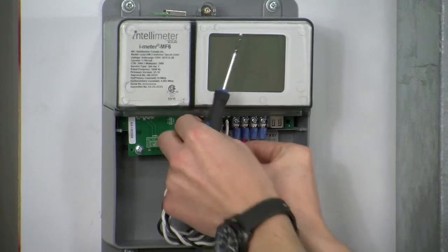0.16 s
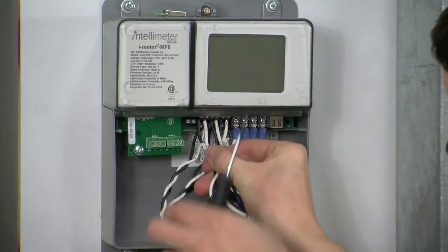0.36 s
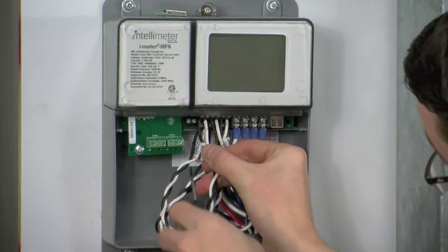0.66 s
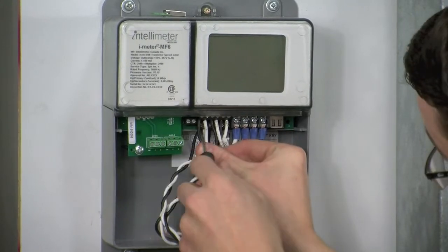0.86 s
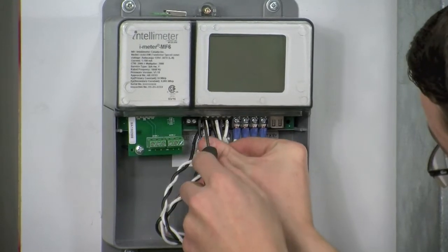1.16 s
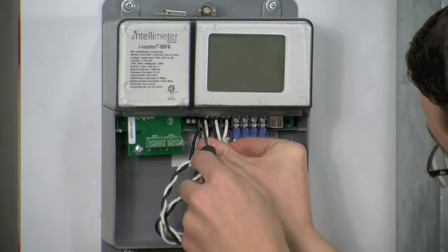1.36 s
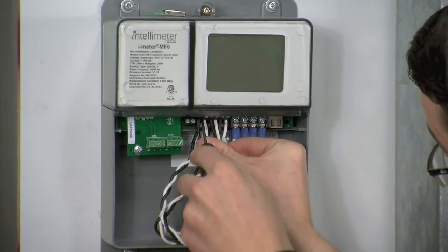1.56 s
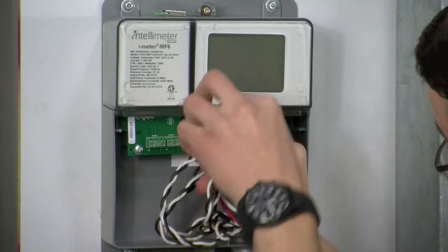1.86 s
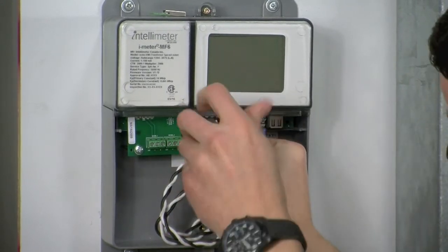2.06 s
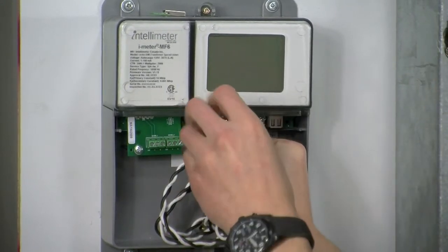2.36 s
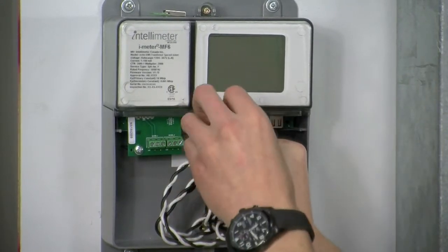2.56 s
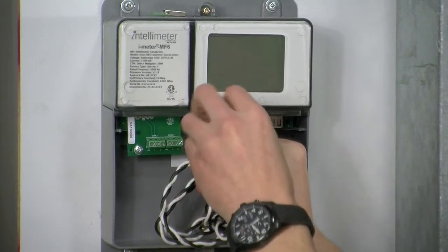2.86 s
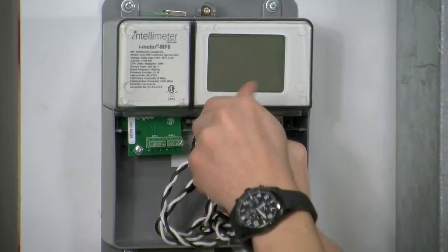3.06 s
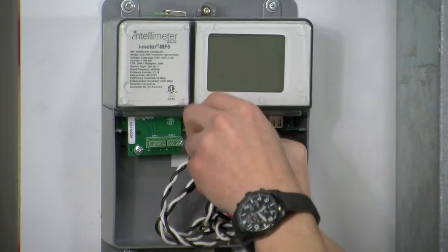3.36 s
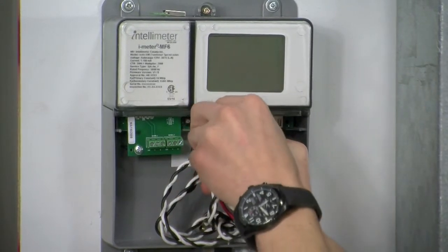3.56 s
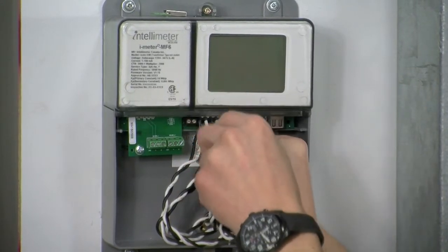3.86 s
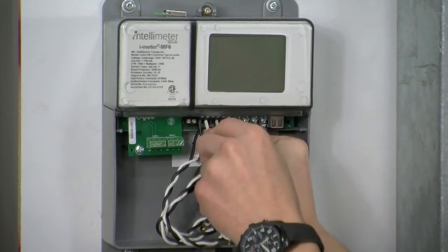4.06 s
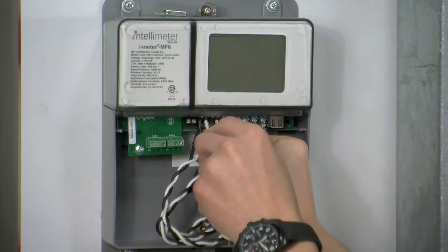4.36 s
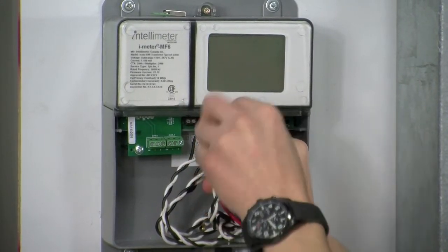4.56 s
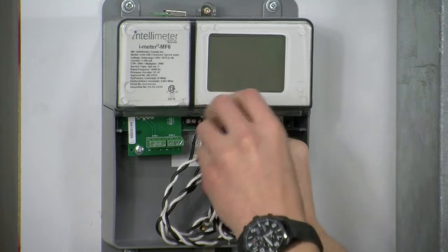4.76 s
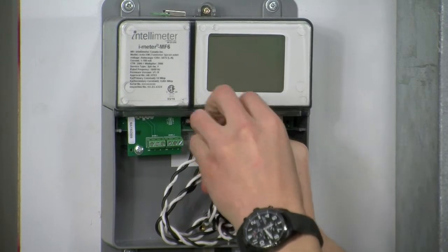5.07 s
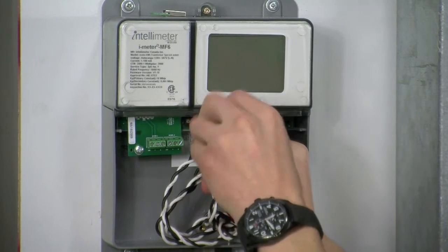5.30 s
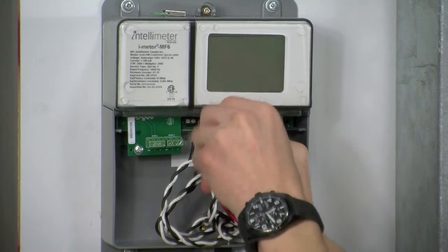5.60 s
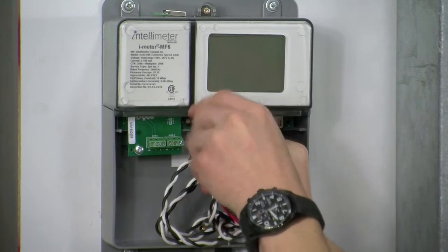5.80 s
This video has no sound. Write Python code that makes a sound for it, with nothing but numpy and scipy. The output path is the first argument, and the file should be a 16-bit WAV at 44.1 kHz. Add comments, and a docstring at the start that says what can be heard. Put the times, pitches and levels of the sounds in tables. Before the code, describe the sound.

Faint clicks, ticks and small plastic knocks as a screwdriver works terminals in a plastic housing, two louder snaps, over a low room hum.

```python
"""In a quiet room with a low hum, a small screwdriver works a terminal strip inside a plastic meter housing.
Contacts knock the housing, then the blade seats, grinds and twice snaps: runs of tiny slips ring the meter.
Stiff wires tick as short rings with a crack; friction grains make gritty swells of rubs and rattling tails.
Now and then a wavering tone squeaks faintly, and fingers tap softly on the low modes of the housing.
Nearly all of the sound is on the left; the right is a faint, later copy with an echo and reflections."""
import sys
import numpy as np
from scipy import signal
from scipy.fft import rfft, irfft, next_fast_len
from scipy.io import wavfile

SR = 44100
rng = np.random.default_rng(int(sys.argv[2]) if len(sys.argv) > 2 else 0)


def int16_out(signal):
    """Quantize to a 16-bit WAV file."""
    q = np.round(np.clip(np.atleast_2d(signal).T, -1, 1) * 32767)
    wavfile.write(sys.argv[1], SR, q.astype(np.int16))


N = 261776
TIME = np.arange(N) / SR         # time in the scene (s)
RING = np.arange(SR // 2) / SR   # time after a contact (s)


# Knocks on the meter housing, and later slips of the blade in the screw; levels before the layer trims.
# Each row: start in seconds, housing thud in dB, thud pitch in Hz, strip clack in dB, clack pitch in Hz,
# metal tick in dB, decay time of the slips in seconds.
CONTACTS = [(0.002, -52, 328, -57, 1110, -59.5, 0.0022), (0.014, -47.5, 370, -61.5, 1080, -57, 0.004),
            (0.138, -61.5, 566, -64, 1100, -92, 0.0084), (0.18, -59.5, 540, -64, 1190, -67, 0.0046),
            (0.373, -56.5, 480, -65, 1140, -67, 0.0012), (0.958, -56.5, 258, -63, 1040, -94, 0.0017),
            (1.0104, -56, 615, -63.5, 1030, -95, 0.0026), (1.446, -55.5, 368, -66, 1380, -58.5, 0.0017),
            (1.456, -50.5, 450, -67, 1080, -80, 0.0044), (1.631, -43, 490, -57, 1480, -66, 0.0045),
            (1.7125, -27, 375, -39.5, 2020, -32, 0.0023), (1.843, -38.5, 306, -44, 1180, -49, 0.0092),
            (1.896, -48.5, 510, -67, 1210, -64, 0.00094), (2.023, -50.5, 315, -57, 1500, -59, 0.011),
            (2.058, -49, 402, -54.5, 1560, -56.5, 0.0037), (2.225, -47, 348, -75, 1500, -69.5, 0.0027),
            (2.251, -52.5, 390, -68, 1680, -61.5, 0.001), (2.27, -46.5, 467, -58, 1200, -64, 0.0043),
            (2.324, -42.5, 360, -63, 1160, -60.5, 0.0056), (2.405, -55.5, 260, -74, 1640, -66.5, 0.003),
            (2.5, -53.5, 368, -75, 1400, -82, 0.0021), (2.532, -54.5, 410, -62.5, 1590, -66.5, 0.0046),
            (2.582, -55, 400, -58, 2230, -65, 0.0047), (2.611, -44.5, 560, -53.5, 1460, -59, 0.0023),
            (2.791, -48, 484, -62, 1230, -68.5, 0.0025), (2.801, -56, 430, -72, 1400, -81, 0.003),
            (2.832, -44, 388, -59, 1060, -60, 0.0063), (2.849, -49, 486, -59.5, 1050, -72, 0.0027),
            (2.912, -49, 446, -58.5, 1290, -63.5, 0.006), (2.993, -54, 407, -74, 1100, -73, 0.0066),
            (3.125, -52.5, 435, -79.5, 1430, -79, 0.0032), (3.167, -48.5, 434, -65, 1770, -61, 0.0033),
            (3.363, -49.5, 375, -60.5, 1890, -80, 0.0036), (3.4, -49.5, 230, -76, 1660, -73, 0.0061),
            (3.533, -55.5, 423, -63, 1390, -62.5, 0.04), (3.87, -50, 450, -74, 1910, -74, 0.0032),
            (3.883, -50.5, 327, -56, 1580, -62.5, 0.0067), (3.896, -44, 307, -58, 1420, -74, 0.0072),
            (4.271, -42.5, 254, -68.5, 1960, -65, 0.006), (4.287, -38, 413, -59, 1020, -62, 0.003),
            (4.6294, -40, 560, -41.5, 1950, -44, 0.00054), (4.649, -43, 540, -60, 1300, -66, 0.015),
            (4.7337, -25, 250, -37, 1080, -38, 0.0014), (4.8061, -42, 285, -49.5, 2050, -61.5, 0.003),
            (4.95, -49, 333, -59, 1370, -76, 0.0032), (4.998, -46.5, 403, -55, 2460, -72, 0.0023),
            (5.062, -47, 266, -65.5, 1400, -66, 0.01), (5.262, -48.5, 350, -59.5, 1370, -75, 0.0013),
            (5.305, -47, 346, -55, 1970, -62.5, 0.0048), (5.354, -40.5, 414, -57, 1370, -60, 0.0037),
            (5.391, -46.5, 487, -61.5, 1400, -68, 0.01), (5.487, -51, 340, -72, 1370, -73, 0.0067),
            (5.596, -51, 427, -55, 1470, -72, 0.0008), (5.623, -48, 380, -51.5, 1420, -63, 0.0048)]
CONTACT_TICK_HZ = 8270   # the metal tick of every contact is lifted in this same register


def contacts(thud_trim_db=1.0, clack_trim_db=2.5, tick_trim_db=-2.0, thud_lag_s=0.000983,
             flex_hz=38, flex_t60=0.18, flex_db=-5):
    """Metal tick and strip clack start together; a moment later the housing thuds and the panel flexes."""
    thuds = register_rings(150, 850, crowd_db=-3, crowd_t60=0.13)
    clacks = register_rings(660, 5270, crowd_db=-2.0, crowd_t60=0.12)
    ticks = register_rings(2280, 22300, crowd_db=-2.0, crowd_t60=0.034)
    flex = from_db(flex_db) * np.sin(2 * np.pi * flex_hz * RING) * fade(flex_t60)
    out = np.zeros(N)
    for row, thud, clack, tick in zip(CONTACTS, thuds, clacks, ticks):
        s, thud_db, thud_hz, clack_db, clack_hz, tick_db, slip_s = row
        # few sharp slips drive strip and metal, a denser push drives the housing
        scrape = slip_force(slip_s, grit_db=-14, slips_per_s=900, swell=0.45)
        push = slip_force(slip_s, grit_db=-21.0, slips_per_s=2500, swell=1.72)

        # the place of the contact decides which resonances speak most
        padded_thud = pad(signal.fftconvolve(thud, push), clack_db - thud_db)
        thud = housing_voice(padded_thud, thud_hz)
        clack = strip_voice(signal.fftconvolve(clack, scrape), clack_hz)
        tick = favour(signal.fftconvolve(tick, scrape), CONTACT_TICK_HZ, gain_db=16, q=2.5)

        add(out, s, from_db(tick_db + tick_trim_db) * attack_one(tick))
        add(out, s, from_db(clack_db + clack_trim_db) * attack_one(clack))
        add(out, s + thud_lag_s, from_db(thud_db + thud_trim_db) * attack_one(thud))
        add(out, s + thud_lag_s, from_db(thud_db) * flex)
    return out


def slip_force(decay_s, grit_db, slips_per_s, swell):
    """Force of one contact: a first catch, then a dying run of tiny random slips that may swell first."""
    t = RING[:SR // 12]
    slips = rng.standard_normal(len(t)) * (rng.random(len(t)) < slips_per_s / SR)
    envelope = np.exp(-t / decay_s) * (1 + swell * t / decay_s)
    # longer runs are also stronger
    force = from_db(grit_db) * decay_s * 1000 * slips * envelope
    force[0] += 1
    return force


# Modes of the plastic housing, the terminal strip and the blade on the screw.
# Each row: pitch in Hz, relative level in dB, decay by 60 dB in seconds.
METER_MODES = [(107, -6, .45), (194.3, -6.5, 0.42), (281, -20, 0.86), (351.7, -8.5, 0.18), (368, 8, 0.018),
               (429.6, -10, 0.11), (483, -2, 0.15), (513, -5.5, 0.12), (664.6, -11, 0.14),
               (771.5, -3.5, 0.043), (900, 1, 0.074), (1052, -6.5, 0.095), (1206, -12.5, 0.1),
               (1412, 1, 0.042), (1526, -11, 0.14), (1700, -10, .035), (2037, -2.5, 0.048),
               (2202, 0.5, 0.043), (2700, 6, 0.01), (5550, -17, 0.041), (5680, 6.5, 0.014),
               (6180, 11, 0.0057), (7060, 2.5, 0.013), (8360, 3.5, 0.0098), (10240, -15, 0.015),
               (12100, 8, 0.0077), (13900, 18, 0.0017)]
# The crowd of weak, overlapping modes under them, as a spectral shape.
# Each row: frequency in Hz, relative density in dB per Hz.
MODE_CROWD = [(120, -15), (300, -0.5), (600, -6), (850, -8.5), (1100, -13), (2300, -14.5), (3200, -25),
              (4200, -21), (6000, -21), (9000, -20), (12000, -25), (15500, -24)]


def register_rings(low_hz, high_hz, crowd_db, crowd_t60):
    """Rings of the meter in one register, one per contact; each strikes the modes a little differently."""
    hz, db, t60 = np.transpose([mode for mode in METER_MODES if low_hz <= mode[0] < high_hz])
    waves = np.sin(2 * np.pi * hz[:, None] * RING) * fade(t60[:, None])
    count = len(CONTACTS)
    strength_db = db + 1.5 * rng.standard_normal((count, len(hz)))
    mode_rings = from_db(strength_db) @ waves

    # one stretch of shaped noise, cut into an eighth of a second per contact
    size = SR // 8
    noise = band(colour(rng.standard_normal(count * size), MODE_CROWD), low_hz, high_hz)
    crowds = np.pad(noise.reshape(count, size), ((0, 0), (0, len(RING) - size)))
    return [attack_one(modes) + from_db(crowd_db) * attack_one(crowd * fade(crowd_t60))
            for modes, crowd in zip(mode_rings, crowds)]


def meter_ring():
    """All single modes of the meter, struck together."""
    return sum(from_db(db) * np.sin(2 * np.pi * hz * RING) * fade(t60) for hz, db, t60 in METER_MODES)


def pad(x, hardness_db, soft_hz=1500, db_per_octave=16):
    """A padded push, which draws little clack from the strip, cannot reach the upper housing modes either."""
    cutoff_hz = np.clip(soft_hz * 2 ** (hardness_db / db_per_octave), 300, 3000)
    return signal.sosfilt(signal.butter(3, cutoff_hz, fs=SR, output="sos"), x)


def housing_voice(x, hz, reach=0.28):
    """The housing speaks around the pitch of the contact, and little far below it."""
    x = signal.sosfilt(signal.butter(2, hz * reach, "high", fs=SR, output="sos"), x)
    return favour(x, hz, gain_db=8.0, q=4.4)


def strip_voice(x, hz, reach=2.42):
    """The strip speaks around the pitch of the contact, and fades above it."""
    x = signal.sosfilt(signal.butter(2, hz * reach, fs=SR, output="sos"), x)
    return favour(x, hz, gain_db=6, q=2.5)


def gritty_swells(grains_per_s=2000, size_db=4, rasp_db=-1, grit_db=-3, groan_db=5, strip_db=-4):
    """Dense grains rasp directly and set the strip and the housing ringing, in rubs and rattling tails."""
    hits = (rng.random(N) < grains_per_s / SR) * rng.choice([-1, 1], N)
    # grain sizes are uneven, with a few much larger ones
    grains = hits * from_db(size_db * np.minimum(rng.exponential(1, N), 4))
    direct = colour(grains, MODE_CROWD)
    rung = signal.fftconvolve(grains, meter_ring())[:N]

    rasp = from_db(rasp_db) * rms_one(band(direct, 2170, 15500))
    grit = from_db(grit_db) * rms_one(band(direct, 660, 3070))
    groan = from_db(groan_db) * rms_one(band(rung, 184, 710))
    strip = from_db(strip_db) * rms_one(band(rung, 1150, 3340))
    return swell_gain() * (rasp + grit + groan + strip)


# Gritty swells: rubs from turning and handling, and the diffuse rattling tails after the two snaps.
# Each row: peak in seconds, gain there in dB, swell in seconds, release in seconds.
GRIT_SWELLS = [(.36, -63.5, 0.15, 0.25), (.63, -72.5, 0.12, 0.52), (1.74, -62, 0.028, .17),
               (2.05, -64.5, 0.43, 0.079), (2.32, -63, 0.24, 0.096), (2.609, -58.5, .1, 0.03),
               (2.9, -60, 0.093, 0.039), (3.2, -67, .08, 0.079), (3.58, -72, 0.069, 0.088),
               (3.91, -82, 0.064, 0.062), (4.66, -63, 0.09, 0.27), (5.073, -55.5, 0.11, 0.033),
               (5.4, -58, 0.095, 0.023), (5.71, -62.5, 0.12, 0.1)]
SWELL_RANGE_DB = 20.5   # rise over the swell time and fall over the release time


def swell_gain():
    """Gain of the grit: every swell rises and lets go, evenly in dB."""
    gain = np.zeros(N)
    for s, db, swell_s, release_s in GRIT_SWELLS:
        distance = np.maximum((s - TIME) / swell_s, (TIME - s) / release_s)
        gain += from_db(db - SWELL_RANGE_DB * distance)
    return gain


# Light ticks of stiff wires and of the blade in the screw head.
# Each row: start in seconds, ring amplitude in dB, pitch in Hz, broad crack against the ring in dB.
LIGHT_TICKS = [(.178, -42.5, 13000, -7), (.3, -31, 2780, -5), (.4735, -50.5, 13500, 0),
               (.569, -42.5, 3040, -0.5), (0.843, -50, 2620, -11), (0.886, -50.5, 2660, -8),
               (1.0098, -39, 1080, -30), (1.029, -44, 1100, -17), (1.049, -50, 1080, -11),
               (1.148, -51, 2680, -13), (1.6735, -40, 5470, -21), (1.843, -38, 6700, -12),
               (1.863, -44, 5360, -13), (1.877, -46, 6700, -11), (2.582, -41, 2500, -15),
               (4.272, -42.5, 2530, -12), (4.634, -29, 2230, -3.5), (4.81, -34, 2020, -9),
               (4.998, -36, 2600, -5.5)]


def light_ticks(ring_t60=0.009, crack_t60=0.011):
    """A light tick is a very short ring with a broad crack around it."""
    out = np.zeros(N)
    for s, db, hz, crack_db in LIGHT_TICKS:
        ring = np.sin(2 * np.pi * hz * RING) * fade(ring_t60)
        noise = band(rng.standard_normal(len(RING)), hz / 2, hz * 2.15)
        crack = attack_one(noise) * fade(crack_t60)
        add(out, s, from_db(db) * (ring + from_db(crack_db) * crack))
    return out


def fingers(from_s=1.4, taps_per_s=4.9, tap_db=-56, spread_db=0.5, low_hz=180, high_hz=650):
    """Padded fingertips tap at random and reach only the low modes of the housing."""
    hits = (rng.random(N) < taps_per_s / SR) * (TIME > from_s)
    taps = hits * from_db(tap_db + spread_db * rng.standard_normal(N))
    housing = attack_one(band(meter_ring(), low_hz, high_hz))
    return signal.fftconvolve(taps, housing)[:N]


# Faint squeaks of the thread, rising as it tightens; pitch and level waver around these values.
# Each row: start in seconds, length in seconds, start pitch in Hz, end pitch in Hz, level in dB.
THREAD_SQUEAKS = [(2.02, .1, 1500, 1674, -62), (2.12, 0.204, 1773, 1806, -66.5),
                  (2.899, 0.038, 1350, 1460, -56.5)]


def squeak(waver=0.017, waver_hz=50, flutter_db=3):
    """Unsteady sticking of the thread: a thin rising tone that wavers in pitch and level."""
    out = np.zeros(N)
    for s, length_s, start_hz, end_hz, db in THREAD_SQUEAKS:
        progress = np.clip(RING / length_s, 0, 1)
        unsteady, flutter = [rms_one(band(rng.standard_normal(len(RING)), 9.2, waver_hz)) for _ in range(2)]
        hz = (start_hz + (end_hz - start_hz) * progress) * (1 + waver * unsteady)
        tone = np.sin(2 * np.pi * np.cumsum(hz) / SR)
        swell = np.sqrt(np.abs(np.sin(np.pi * progress)))
        add(out, s, from_db(db + flutter_db * flutter) * swell * tone)
    return out


def room(x, low_t60=0.4, middle_db=-3, treble_db=-3, build_s=0.0019):
    """A short diffuse tail of decaying noise in which the lows last longest."""
    low = band(rng.standard_normal(len(RING)), 129, 1200)
    middle = from_db(middle_db) * band(rng.standard_normal(len(RING)), 750, 3300)
    high = from_db(treble_db) * band(rng.standard_normal(len(RING)), 2700, 16000)
    tail = low * fade(low_t60) + (middle + high) * fade(low_t60 / 2)
    tail *= 1 - np.exp(-RING / build_s)
    return signal.fftconvolve(x, tail / np.linalg.norm(fade(low_t60)))[:N]


# Spectral shape of room rumble and hiss.
# Each row: frequency in Hz, relative density in dB per Hz.
ROOM_FLOOR = [(15, -8), (45, -8), (75, -0.5), (120, -0.5), (180, -10.5), (300, -22), (500, -20),
              (1000, -27), (2200, -34), (3600, -39), (9000, -42.5), (16000, -45.5)]
# Machine hum lines. Each row: pitch in Hz, rms level in dB.
HUM_LINES = [(75.4, -60), (118.4, -65)]


def background(floor_db=-51.5):
    """Low rumble with hiss above it, both shaped from noise, and steady hum lines."""
    hum = np.zeros(N)
    for hz, db in HUM_LINES:
        hum += from_db(db) * np.sqrt(2) * np.sin(2 * np.pi * (hz * TIME + rng.random()))
    return from_db(floor_db) * rms_one(colour(rng.standard_normal(N), ROOM_FLOOR)) + hum


# What reaches the right channel.
# Each row: frequency in Hz, gain in dB.
RIGHT_RESPONSE = [(30, -63), (70, -39.5), (120, -25.5), (200, -23), (400, -28), (1000, -24.5), (2500, -20),
                  (6000, -29), (11000, -47), (15000, -56)]


def right_channel(work, direct_lag_s=0.0017, direct_db=-6, echo_s=0.0063, echo_db=-8, room_db=-3,
                  hiss_db=-85.5):
    """The work arrives late with an inverted echo and reflections, all dulled and faint, over a thin hiss."""
    direct, echo = [np.interp(TIME - lag_s, TIME, work, left=0) for lag_s in (direct_lag_s, echo_s)]
    arriving = from_db(direct_db) * direct - from_db(echo_db) * echo
    arriving = arriving + from_db(room_db) * room(work) + background()
    return colour(arriving, RIGHT_RESPONSE) + from_db(hiss_db) * rng.standard_normal(N)


def from_db(db):
    """Decibels to gain."""
    return 10 ** (np.asarray(db) / 20)


def rms_one(x):
    """Scale to rms 1."""
    return x / np.sqrt(np.mean(x ** 2) + 1e-20)


def attack_one(x):
    """Scale so that the first 25 ms have rms 1."""
    return x / np.sqrt(np.mean(x[:SR // 40] ** 2) + 1e-20)


def fade(t60):
    """Exponential decay after a contact, by 60 dB in t60 seconds."""
    return np.exp(-np.log(1000) * RING / t60)


def colour(x, spectrum):
    """Shape a signal by (Hz, dB) points, joined along a logarithmic frequency axis."""
    hz, db = np.transpose(spectrum)
    size = next_fast_len(len(x))
    grid_hz = np.maximum(np.arange(size // 2 + 1) * SR / size, 1)
    gain = from_db(np.interp(np.log(grid_hz), np.log(hz), db))
    return irfft(rfft(x, size) * gain, size)[:len(x)]


def band(x, low_hz, high_hz):
    """Causal band-pass."""
    edges_hz = [low_hz, min(high_hz, SR / 2 - 1)]
    return signal.sosfilt(signal.butter(3, edges_hz, "band", fs=SR, output="sos"), x)


def favour(x, hz, gain_db, q):
    """Lift the region around one pitch."""
    b, a = signal.iirpeak(hz, q, fs=SR)
    return x + (from_db(gain_db) - 1) * signal.lfilter(b, a, x)


def add(track, s, sound):
    """Mix a sound in at a given time."""
    start = max(round(s * SR), 0)
    track[start:start + len(sound)] += sound[:N - start]


def scene(left_room_db=-14.5):
    """The left channel is close to the work; the right hears it faintly, later and mostly by reflections."""
    work = contacts() + gritty_swells() + light_ticks() + fingers() + squeak()
    left = work + from_db(left_room_db) * room(work) + background()
    return np.array([left, right_channel(work)])


def record(dry, cutoff_hz=15900):
    """A steep low-pass cuts the top."""
    return signal.sosfilt(signal.ellip(10, .1, 90, cutoff_hz, fs=SR, output="sos"), dry)


dry = scene()
out = record(dry)
int16_out(out)
```